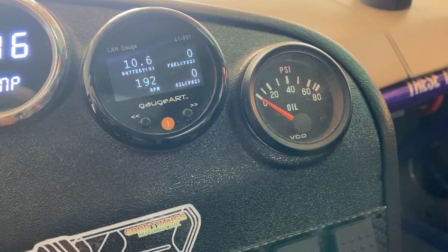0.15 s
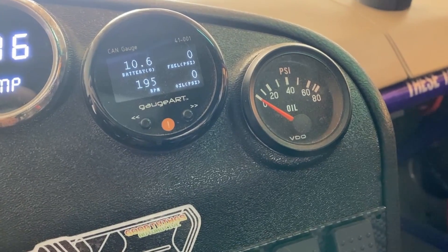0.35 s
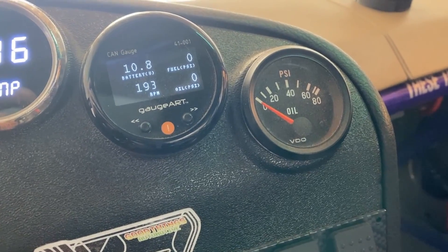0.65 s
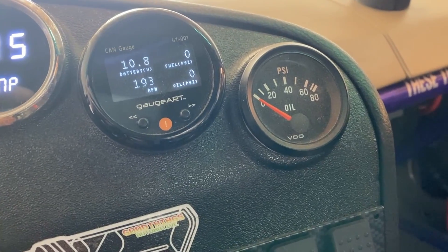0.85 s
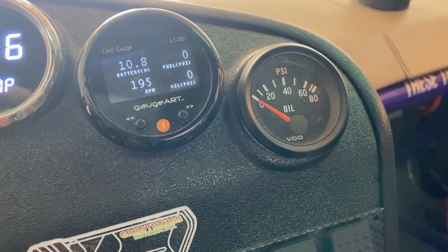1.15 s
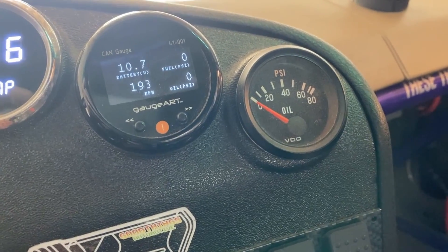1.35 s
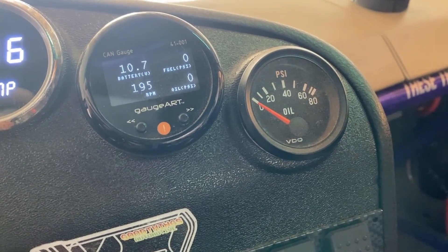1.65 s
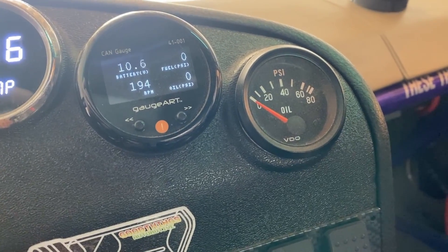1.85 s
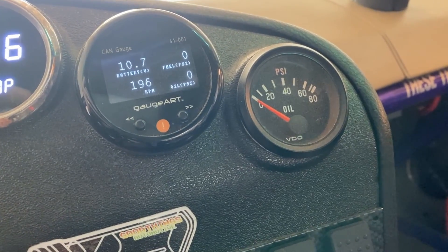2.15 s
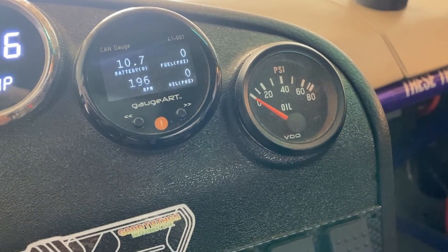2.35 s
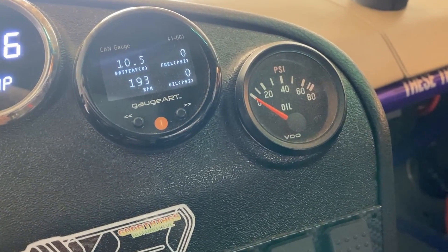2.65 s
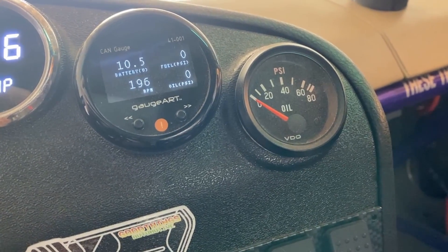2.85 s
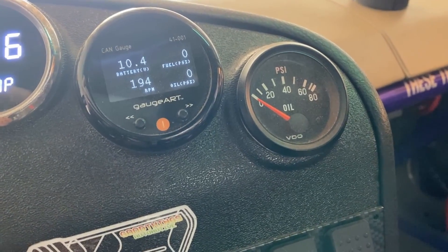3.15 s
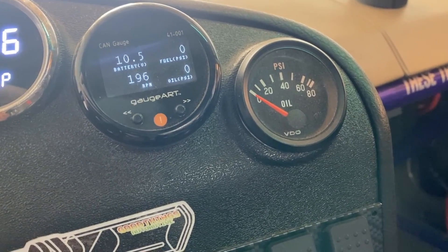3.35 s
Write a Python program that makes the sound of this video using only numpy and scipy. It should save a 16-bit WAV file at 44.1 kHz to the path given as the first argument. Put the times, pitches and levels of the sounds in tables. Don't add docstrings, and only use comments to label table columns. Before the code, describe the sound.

A starter motor cranks a car engine that never fires, about ten rattling chugs per second, over low pulsing booms and a faint whir, heard close from the cabin in a small, fairly dry garage.

```python
import sys
import numpy as np
from scipy import signal
from scipy.fft import rfft, irfft
from scipy.io import wavfile
from scipy.ndimage import uniform_filter1d

SR = 44100
rng = np.random.default_rng(int(sys.argv[2]) if len(sys.argv) > 2 else 0)


def volts(x):
    e = np.asarray(x, float) / 20
    return 10 ** e


def output_pcm(signal):
    pcm = np.clip(np.atleast_2d(signal).T, -1, 1) * 32767
    wavfile.write(sys.argv[1], SR, np.round(pcm).astype(np.int16))


N = 154350
CYCLE_S = 0.6138
RISE_S = 0.0077

# (time [s], peak level [dB])
BANK_A = [(0.016, -10.5), (0.224, -9.5), (0.425, -7.5), (0.633, -9.5), (0.84, -9), (1.043, -9),
          (1.253, -10.5), (1.456, -10), (1.661, -7.5), (1.864, -10), (2.072, -9), (2.275, -8),
          (2.475, -9.5), (2.683, -8.5), (2.887, -9), (3.091, -10), (3.298, -7.5)]
# (time [s], peak level [dB])
BANK_B = [(0.121, -8.5), (0.319, -9.5), (0.522, -11), (0.736, -7), (0.934, -9), (1.137, -10), (1.358, -8.5),
          (1.55, -9), (1.752, -11), (1.974, -7.5), (2.163, -9), (2.361, -9), (2.579, -8), (2.782, -10.5),
          (2.976, -10), (3.19, -7.5), (3.392, -8.5)]
# (low boom [dB], high boom [dB], thump [dB], thump delay [s], low knock [dB])
CYLINDERS = [(-13.5, -18, -24, .005, -2), (-15, -18.5, -23, .022, 0), (-13, -20, -24, .025, 0),
             (-20, -19.5, -23, .065, 0), (-14, -25, -17, .035, -1), (-14, -20, -25, .06, -1)]


def evened(x):
    return x / np.sqrt(np.mean(x ** 2) + 1e-20)


def read(points, hz):
    f, value = np.transpose(points)
    return np.interp(np.log(hz + 1), np.log(f + 1), value)


def colour(x, points):
    gain = volts(read(points, np.fft.rfftfreq(N, 1 / SR)))
    return evened(irfft(rfft(x) * gain, N))


def drift(smooth_s):
    width = round(smooth_s * SR)
    once = uniform_filter1d(rng.standard_normal(N), width)
    return evened(uniform_filter1d(once, width))


def ring(x, modes):
    sway_db, sway_s = 2.5, 0.025
    out = np.zeros_like(x)
    for hz, db, width in modes:
        r = np.exp(-np.pi * width / SR)
        poles = [1, -2 * r * np.cos(2 * np.pi * hz / SR), r * r]
        y = signal.lfilter([1, 0, -1], poles, x * volts(sway_db * drift(sway_s)))
        out += volts(db) * evened(y)
    return evened(out)


def chug_envelope(column=None):
    hold_s, sag_db, release_db_per_s = 0.043, -3, 253
    clack_db, clack_s = -1, 0.002
    hold_shares = [1.12, 0.91, 1.02, 0.99, 0.87, 1.22]
    strokes = sorted(BANK_A + BANK_B)
    strokes = [(strokes[0][0] - CYCLE_S / 6, strokes[5][1])] + strokes
    t, total = np.arange(N) / SR, np.zeros(N)
    for k, (start, db) in enumerate(strokes):
        cylinder = (k - 1) % 6
        u = t - start + RISE_S / 2
        hold = hold_s * hold_shares[cylinder]
        shape_db = sag_db * np.clip(u / hold, 0, 1)
        shape_db -= release_db_per_s * np.clip(u - hold, 0, 1)
        shape_db += clack_db * np.exp(-np.clip(u - RISE_S, 0, 1) / clack_s)
        extra_db = 0 if column is None else CYLINDERS[cylinder][column]
        total += (np.clip(u / RISE_S, 0, 1) * volts(db + extra_db + shape_db)) ** 2
    return np.sqrt(total)


def gears():
    rattle_per_s, spread_db, hiss = 1800, 1.5, 0.69
    strike_db, knock_depth, soften_s = 17.5, 0.64, 0.005
    chug_db, ring_db, knock_db = -8, -10, -11
    # (frequency [Hz], density [dB per Hz])
    chug_spectrum = [(90, 6.5), (250, -1.5), (700, -2.5), (1350, -2.5), (2070, -16.5), (5000, -24),
                     (8000, -78), (16000, -98)]
    # (frequency [Hz], level [dB], width [Hz])
    housing = [(490, -6, 22), (603, -3, 25), (664, -1, 35), (734, 1, 28), (800, -7, 35), (888, -6, 35),
               (986, -4, 27), (1076, -6, 25), (1143, -3, 22), (1227, -5, 15), (1314, -4, 20),
               (1604, -10, 40), (1729, -11, 24), (2326, -13, 18)]
    # (frequency [Hz], level [dB], width [Hz])
    panels = [(180, 0, 24), (227, -1, 24), (290, -10, 30), (360, -4, 18)]
    clicks = (rng.random((2, N)) < rattle_per_s / SR) * rng.choice([-1., 1.], (2, N))
    clicks *= volts(spread_db * np.minimum(rng.exponential(1, (2, N)), 4))
    drive = evened(clicks) + hiss * rng.standard_normal((2, N))
    struck = drive.copy()
    for start, _ in BANK_A + BANK_B:
        struck[:, round((start + RISE_S / 2) * SR)] += volts(strike_db)
    chug = chug_envelope()
    knock = chug_envelope(column=4) ** knock_depth
    softened = uniform_filter1d(chug, round(soften_s * SR))
    chatter = volts(chug_db) * colour(drive * softened, chug_spectrum)
    ringing = volts(ring_db) * ring(struck * chug, housing)
    knocking = volts(knock_db) * ring(drive * knock, panels)
    return np.sqrt(np.mean(chug ** 2)) * (chatter + ringing + knocking)


def garage(x):
    wet_db, t60_s, gap_s = -13, 0.22, 0.006
    t = np.arange(SR // 2) / SR
    tail = rng.standard_normal((2, len(t))) * volts(-60 * t / t60_s) * (t > gap_s)
    wet = signal.fftconvolve(x, tail / np.linalg.norm(tail[0]), axes=1)[:, :N]
    return x + volts(wet_db) * wet


def motor():
    whir_db, whine_db, rumble_db = -30.5, -34.5, -28
    throb_db, whine_throb = -0.5, 2.2
    # (frequency [Hz], density [dB per Hz])
    whir_spectrum = [(90, -0.5), (300, -10), (1300, 3.5), (2100, -10.5), (5200, -14), (6500, -27.5),
                     (11000, -25), (15900, -35)]
    # (frequency [Hz], level [dB], width [Hz])
    case_modes = [(2650, 0, 200), (3150, -6, 120), (4190, -7, 120), (4900, -2, 300)]
    # (frequency [Hz], density [dB per Hz])
    rumble_spectrum = [(20, -30), (38, 1), (50, -6), (68, 2.5), (88, -4.5), (120, -5), (145, -19),
                       (400, -70)]
    brushes, meshing, shaking = rng.standard_normal((3, 2, N))
    throb = volts(throb_db * evened(np.log(chug_envelope() + 1e-3) + 2))
    whir = volts(whir_db) * colour(brushes * throb, whir_spectrum)
    whine = volts(whine_db) * ring(meshing * throb ** whine_throb, case_modes)
    return whir + whine + volts(rumble_db) * colour(shaking, rumble_spectrum)


def booms():
    low_order, low_slip, low_throb_db = 36, 0.21, 1.5
    high_order, high_slip, high_throb_db = 47, 0.19, 2.0
    cycle_start_s, beat_peak_s = 0.015, 0.066
    thump_hz, thump_s = 107, 0.017
    # (time [s], lead [s])
    crank_lead = [(0, .0037), (.6, .003), (1.2, 0), (2.2, -.0005), (3.5, .001)]
    t = np.arange(N) / SR
    t = t + np.interp(t, *np.transpose(crank_lead)) - cycle_start_s
    turn = t / CYCLE_S
    low_db, high_db, thump_db, delay_s = np.transpose(CYLINDERS)[:4]
    middle = (np.arange(6) + .5) / 6

    def weigh(db):
        return volts(uniform_filter1d(np.interp(turn, middle, db, period=1), 800))

    at = 2 * np.pi * (t - beat_peak_s) / CYCLE_S
    throb = np.cos(6 * at)
    low = weigh(low_db) * volts(low_throb_db * throb) * np.cos(low_order * at - low_slip * np.sin(at))
    slip = high_slip * 2 * np.pi * np.sin(at) + 0.2 * drift(0.19)
    high = weigh(high_db) * volts(high_throb_db * throb + 1.8 * drift(0.11))
    high = high * np.cos(high_order * at + slip)
    thumps = np.zeros(N)
    for k in range(6):
        u = ((turn - k / 6 - delay_s[k] / CYCLE_S + .5) % 1 - .5) * CYCLE_S
        pulse = np.exp(-(u / thump_s) ** 2 / 2) * np.sin(2 * np.pi * thump_hz * u)
        thumps += volts(thump_db[k]) * pulse
    return low + high + thumps


def scene():
    low_cut_hz = 36
    # (frequency [Hz], left-right likeness [0-1])
    likeness = [(60, 0.65), (150, 0.86), (380, 0.47), (950, 0.083), (2380, 0.11), (5980, 0.077),
                (15000, 0.1)]
    # (frequency [Hz], left minus right [dB])
    balance = [(60, 0), (130, -1.5), (290, -0.5), (640, -4.5), (1410, -1.0), (3100, -2), (6820, -7),
               (15000, 12.5)]
    a, b = rfft(garage(gears()) + motor())
    boom = rfft(booms())
    hz = np.fft.rfftfreq(N, 1 / SR)
    same = np.sqrt(np.clip(read(likeness, hz), 0, 1))
    lean = volts(read(balance, hz) / 2)
    left = (a + boom) * lean
    right = (same * a + np.sqrt(1 - same ** 2) * b + boom) / lean
    low_cut = (1 + (low_cut_hz / (hz + 1)) ** 4) ** .5
    return irfft(np.array([left, right]) / low_cut, N)


def thinned_mid(mid):
    gap_db, open_s, edge_hz = -45, 0.046, 15750
    fleck_hz, fleck_share = 15000, 0.22
    # (lower edge [Hz], upper edge [Hz])
    mid_gaps = [(8300, 9600), (12400, 22000)]
    open_levels = [-4., -.5]
    gap_opens = [.13, .34, .56, .77, .99, 1.2, 1.52, 1.85, 2.06, 2.38, 2.48, 2.7, 2.91, 3.23, 3.5]
    hz, t, z = signal.stft(mid, SR, nperseg=512)
    open_db = sum(db * ((hz > lo) & (hz < hi)) for (lo, hi), db in zip(mid_gaps, open_levels))[:, None]
    shut = abs(t[:, None] - gap_opens).min(axis=1) > open_s / 2
    lit = np.repeat(rng.random(len(t) // 8 + 1) < fleck_share, 8)[:len(t)]
    fleck = lit & (hz > fleck_hz)[:, None]
    gain = volts(np.where(shut & ~fleck & (open_db != 0), gap_db, open_db))
    return signal.istft(z * gain * (hz < edge_hz)[:, None], SR, nperseg=512)[1][:N]


def thinned_side(side):
    # (lower edge [Hz], upper edge [Hz])
    side_gaps = [(10300, 11650), (14600, 22000)]
    hz, _, z = signal.stft(side, SR, nperseg=512)
    lost = sum((hz > lo) & (hz < hi) for lo, hi in side_gaps)
    return signal.istft(z * volts(-45 * lost[:, None]), SR, nperseg=512)[1][:N]


def band_limit(x):
    return signal.sosfilt(signal.butter(12, 15940, fs=SR, output="sos"), x)


def record(dry):
    left, right = np.tanh(dry * 0.88) / 0.94
    mid = thinned_mid((left + right) / 2)
    side = thinned_side((left - right) / 2)
    return band_limit(np.array([mid + side, mid - side]))


dry = scene()
out = record(dry)
output_pcm(out)
```